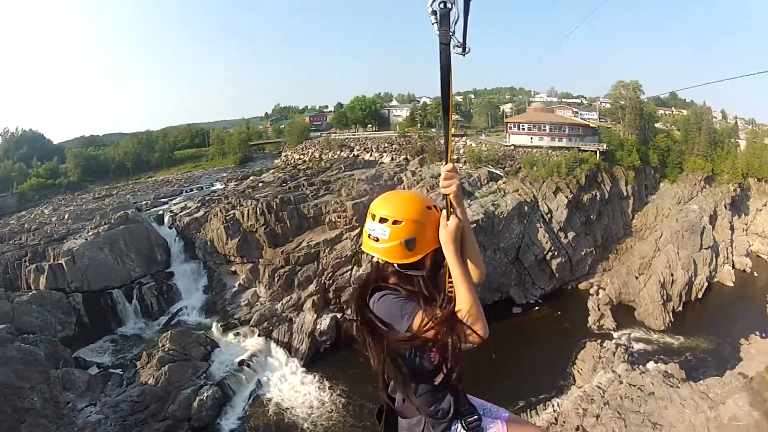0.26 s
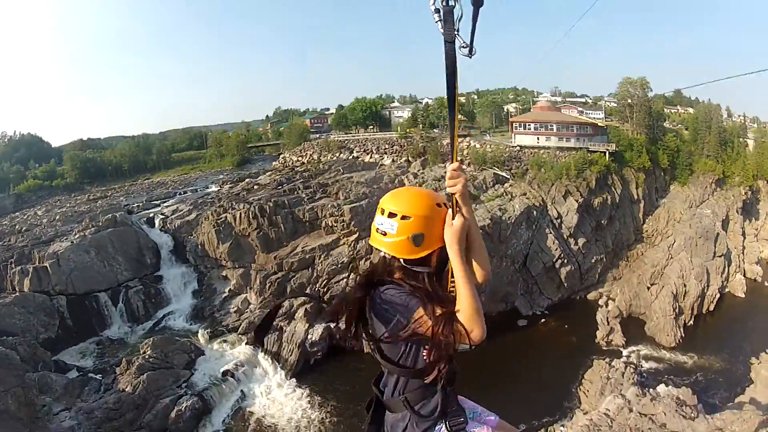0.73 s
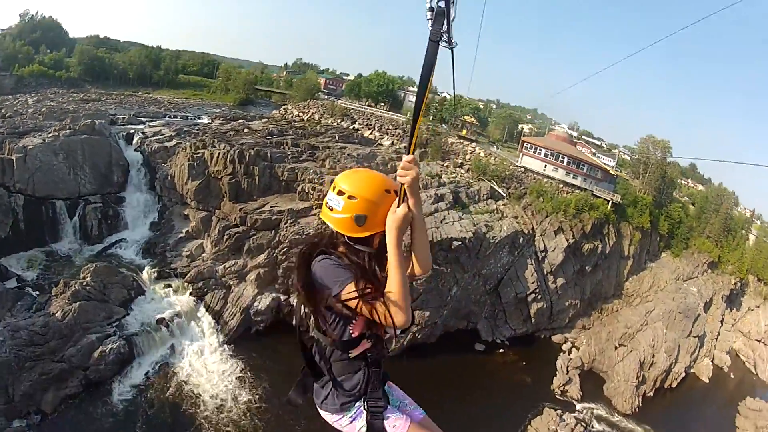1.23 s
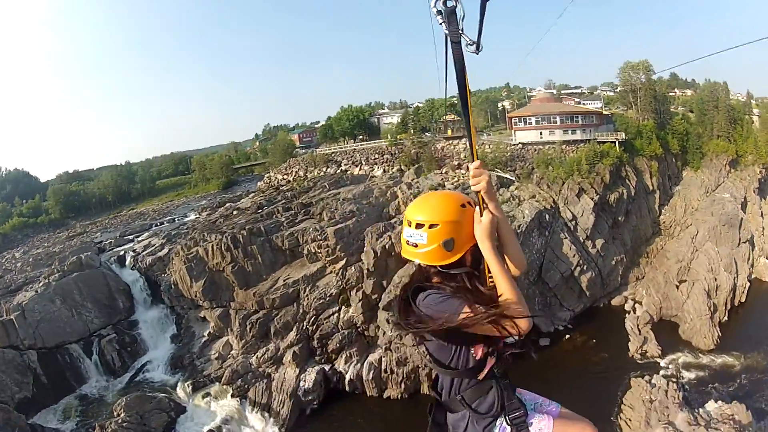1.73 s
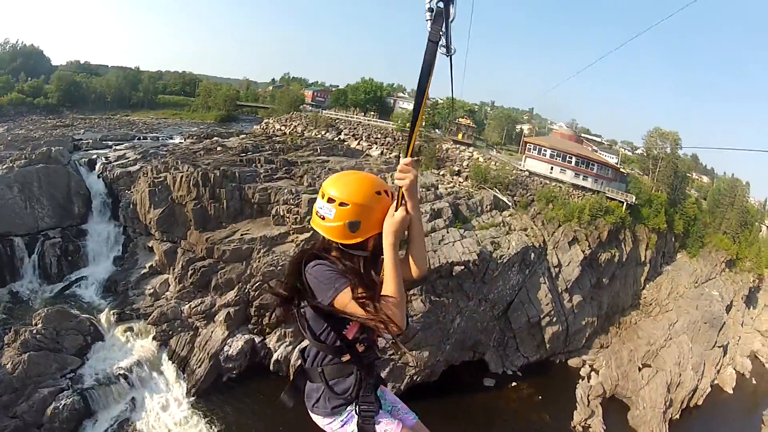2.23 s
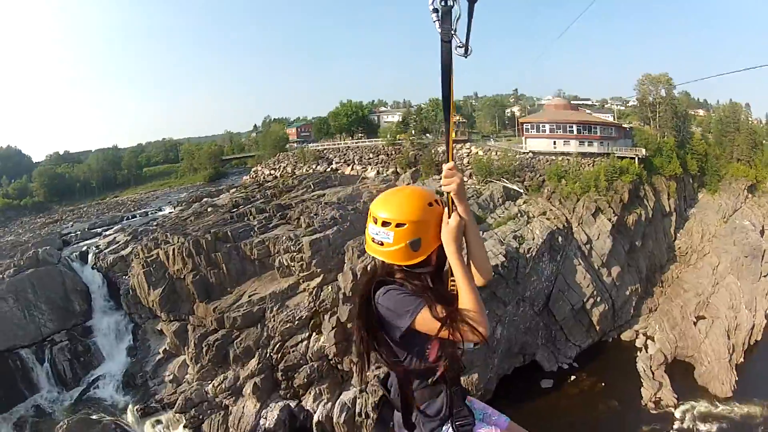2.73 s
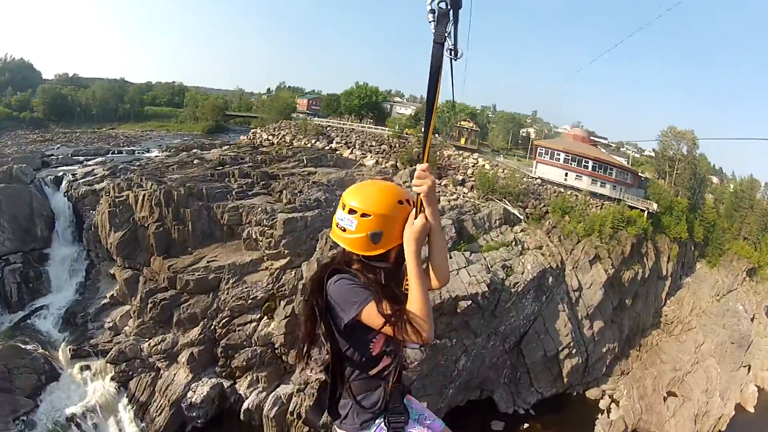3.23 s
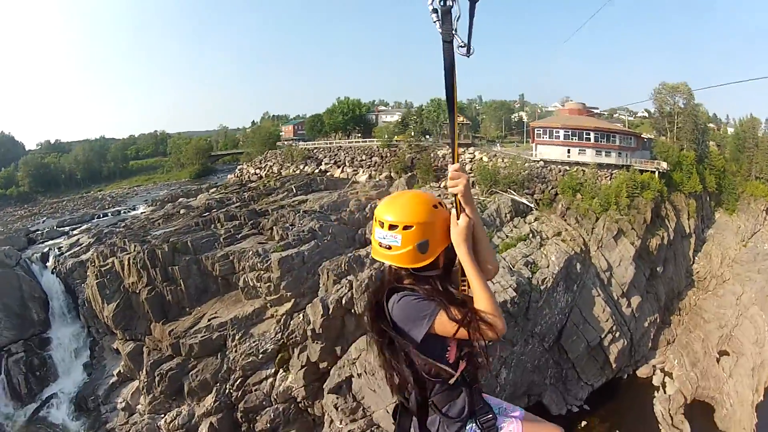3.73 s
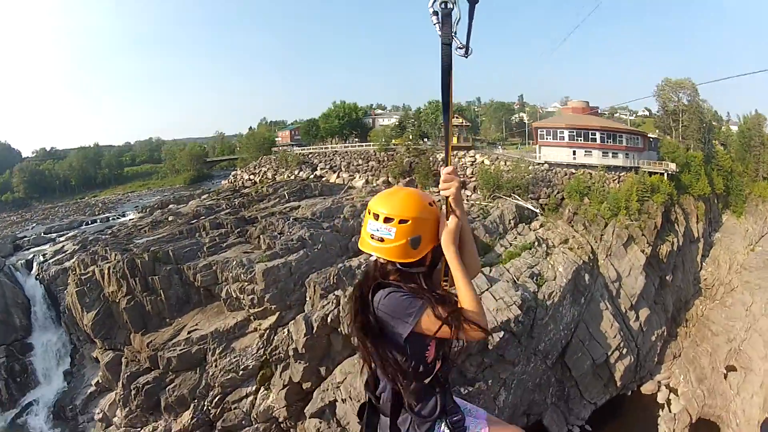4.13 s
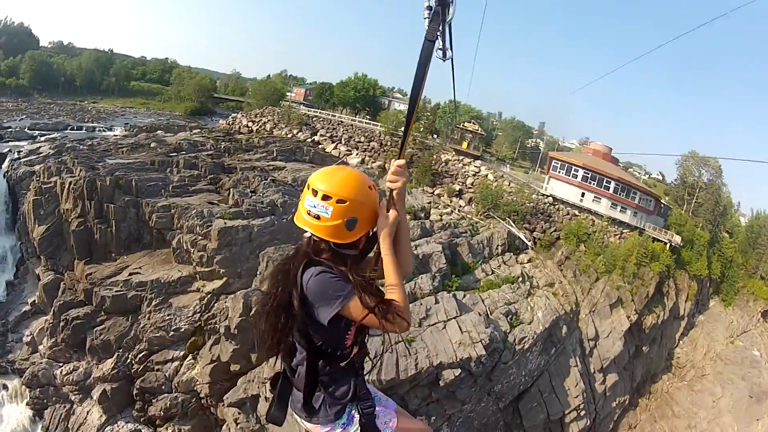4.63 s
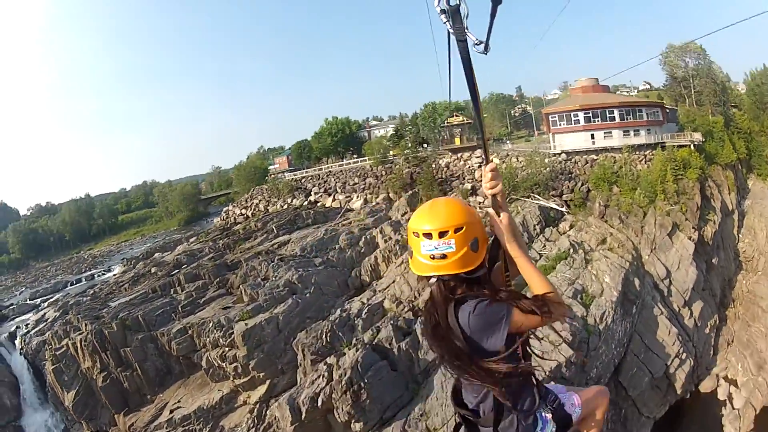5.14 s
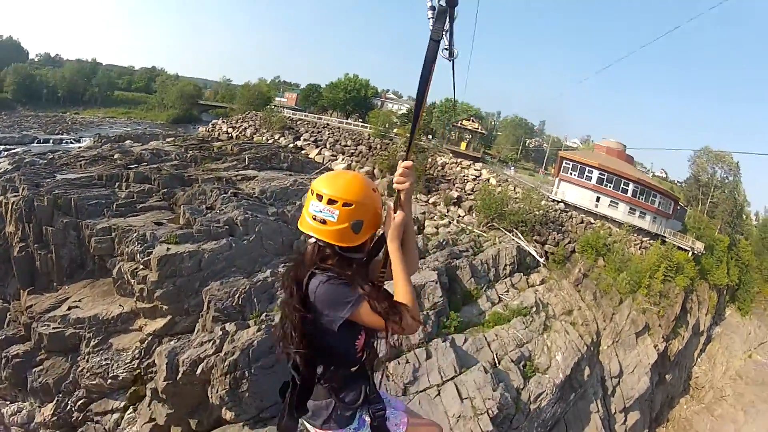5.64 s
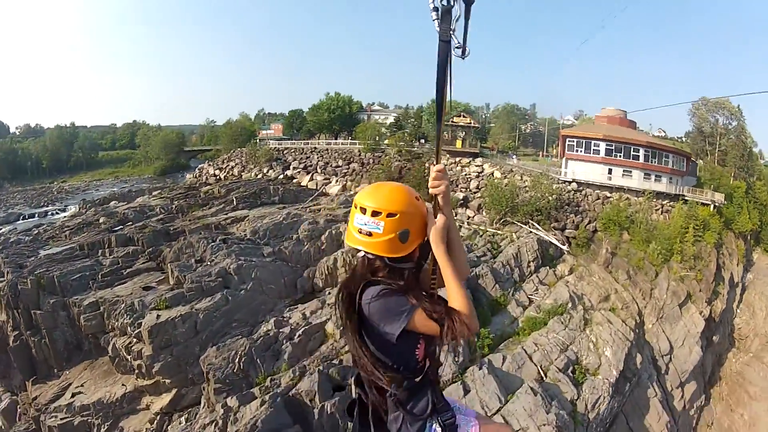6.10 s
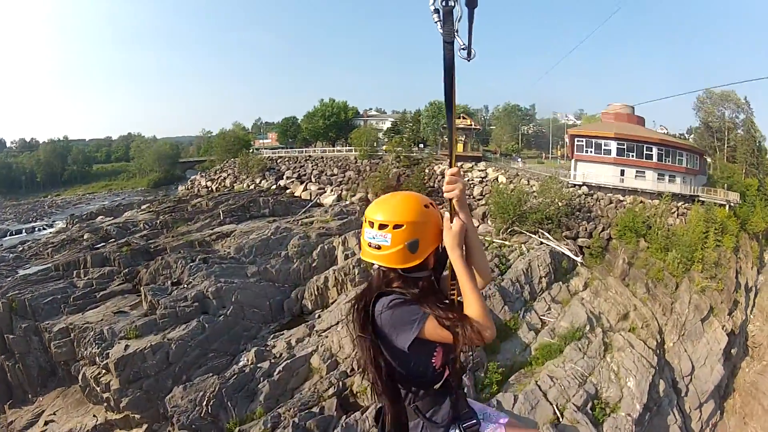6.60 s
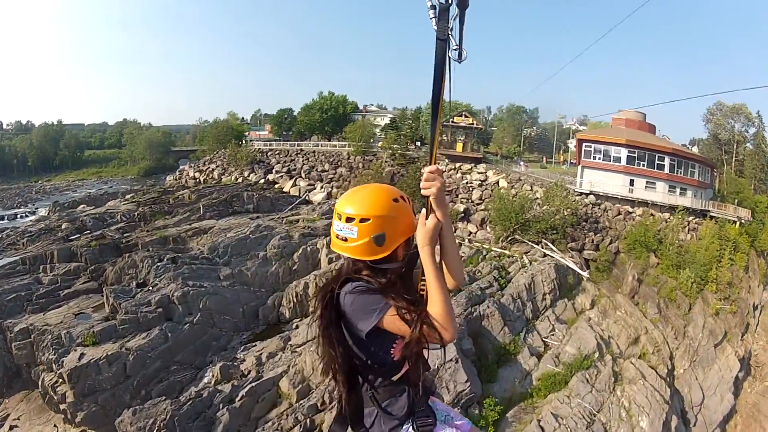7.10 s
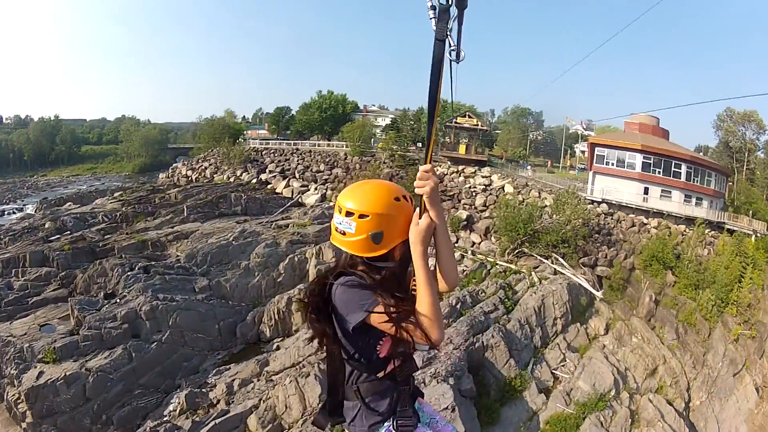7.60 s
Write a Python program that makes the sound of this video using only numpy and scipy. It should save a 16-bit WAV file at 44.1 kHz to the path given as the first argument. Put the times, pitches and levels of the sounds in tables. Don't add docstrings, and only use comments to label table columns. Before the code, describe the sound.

A trolley's wheels roll along a steel cable with a harsh rattling whir, irregular dull knocks and a wavering hum that slowly falls in pitch.

```python
import sys
import numpy as np
from scipy import signal
from scipy.fft import rfft, irfft, next_fast_len
from scipy.io import wavfile
from scipy.ndimage import uniform_filter1d

SR = 44100
rng = np.random.default_rng(int(sys.argv[2]) if len(sys.argv) > 2 else 0)


def linear_from_db(decibels):
    return 10 ** (np.asarray(decibels, float) / 20)


def store_pcm(level_fs):
    pcm = np.round(np.clip(level_fs, -1, 1) * 32767).astype(np.int16)
    wavfile.write(sys.argv[1], SR, np.atleast_2d(pcm).T)


N = 346626
T = np.arange(N) / SR
F = np.fft.rfftfreq(next_fast_len(N), 1 / SR)


def curves(table):
    seconds, *columns = np.transpose(table)
    return [np.interp(T, seconds, column) for column in columns]


def unit(x):
    return x / np.sqrt(np.mean(x ** 2))


def noise():
    return rng.standard_normal(N)


def walk(rate_hz):
    hold = int(SR / rate_hz)
    held = np.repeat(rng.standard_normal(N // hold + 1), hold)
    smooth = uniform_filter1d(uniform_filter1d(held, hold), hold)
    return unit(smooth[:N])


def bump(s, length_s):
    return np.exp(-(2 * (T - s) / length_s) ** 2)


def ring(x, power):
    cepstrum = irfft(np.log(power + 1e-12) / 2)
    half = len(cepstrum) // 2
    cepstrum[1:half] *= 2
    cepstrum[half + 1:] = 0
    response = np.exp(rfft(cepstrum))
    return irfft(rfft(x, len(cepstrum)) * response)[:N]


def body(modes, steep=1.28):
    return sum(linear_from_db(2 * db) / (1 + (2 * (F - hz) / width) ** 2) ** steep for hz, width, db in modes)


def case(cutoff_hz=548, leak_db=-11.5, order=12):
    return linear_from_db(2 * leak_db) + 1 / (1 + (cutoff_hz / (F + 1)) ** (2 * order))


# time in seconds, level in dB.
WIND_LEVEL = [
    (0, -43),
    (1.1, -39.5),
    (1.6, -43),
    (2.4, -41),
    (3.3, -49),
    (4.3, -44.5),
    (5.6, -41),
    (6.9, -46.5),
    (7.4, -50.5),
    (7.86, -45),
]
# peak time in seconds, level in dB, length in seconds,
# level of the upper rumble relative to the thump in dB.
GUSTS = [(.08, -31, 0.22, -4), (0.317, -40, 0.072, -14), (0.622, -36, 0.18, -6), (.81, -31, .07, -18),
         (1.047, -35, 0.087, -11), (1.3, -41, .07, 6), (1.493, -41, .06, 3), (1.97, -38, .07, -4),
         (2.118, -38, 0.036, 0), (2.19, -37, .06, -6), (2.3, -39, .05, 2), (2.6, -42, .08, -1),
         (2.883, -40, .04, 4), (3.06, -41, .06, -4), (3.533, -38, .04, -8), (4.08, -42, .1, -4),
         (4.53, -35, .1, -13), (4.746, -34, .05, -10), (5.115, -39, 0.092, -7), (5.41, -42, .06, -3),
         (5.7, -43, 0.12, 2), (5.912, -31, 0.067, -3), (6.14, -25, .055, -1), (6.39, -44, 0.061, 0),
         (7.0, -41, 0.18, -4), (7.2, -36.5, .06, -5)]


def wind():
    steady = linear_from_db(curves(WIND_LEVEL)[0])
    thump = steady.copy()
    rumble = steady * linear_from_db(5.5)
    for s, db, length_s, upper_db in GUSTS:
        swell = bump(s, length_s)
        thump += linear_from_db(db) * swell
        rumble += linear_from_db(db + upper_db) * swell
    deep = unit(ring(noise(), body([(67, 140, 0)], steep=2.2)))
    upper = unit(ring(noise(), body([(156.4, 200, 0)], steep=1.7)))
    stream = unit(ring(noise(), body([(150, 240, -2), (418, 120, 1)], steep=1.69)))
    gusting = linear_from_db(-4.5) * thump * deep + linear_from_db(-6.0) * rumble * upper
    return linear_from_db(1.2 * walk(14)) * gusting + linear_from_db(-43.5) * stream


# time in seconds, hum level in dB.
HUM_LEVEL = [(0, -39), (.45, -31.5), (.95, -33), (1.4, -42), (2.2, -35), (3.1, -31.5), (4.0, -30),
             (4.4, -31.5), (5.35, -26.5), (5.75, -29), (6.1, -34), (6.7, -35), (7.05, -41), (7.42, -39),
             (7.58, -29), (7.86, -28.5)]


def hum(turn):
    phase = 2 * np.pi * turn + 0.4 * walk(6)
    tone = np.sin(phase) + linear_from_db(-12.5) * np.sin(2 * phase)
    level_db = curves(HUM_LEVEL)[0] + 1.7 * walk(9)
    return np.sqrt(2) * tone * linear_from_db(level_db)


# time in seconds, peak level in dB, pitch in Hz,
# depth of the gain duck that follows in dB.
KNOCKS = [(0.225, -6, 910, 7.5), (0.376, -14, 704, 3.5), (0.767, -10, 700, 0), (1.82, -5, 700, 7),
          (2.034, -6, 875, 11.5), (2.41, -7, 880, 2), (3.359, -4.5, 880, 8), (3.511, -21, 592, 4),
          (3.849, -13, 883, 2.5), (4.055, -17, 630, 1.5), (4.387, -11, 735, 2), (4.998, -11, 600, -0.5),
          (5.222, -8, 1010, 3), (5.391, -6, 593, 4), (5.693, -5.5, 746, 5.5), (6.32, -6, 560, 3),
          (6.673, -6, 1410, 8), (6.939, -13, 641, 4), (7.016, -7, 700, 1), (7.332, -17, 982, 3.5)]


def knocks():
    out = np.zeros(N + SR)
    t = np.arange(SR // 40) / SR
    envelope = (t / 0.0013) * np.exp(1 - t / 0.0012)
    for s, db, hz, _ in KNOCKS:
        start = int((s - 0.0015) * SR)
        out[start:start + len(t)] += linear_from_db(db - 4.0) * np.sin(2 * np.pi * hz * t) * envelope
    return out[:N]


def taps(per_s, scatter_db):
    hit = rng.random(N) < per_s / SR
    sign = rng.choice([-1., 1.], N)
    return unit(hit * sign * linear_from_db(scatter_db * rng.exponential(size=N)))


# frequency in Hz, width in Hz, level in dB.
LOW_MODES = [(580, 69, 2.5), (689, 103, 0.5), (753, 52, -0.5), (866, 73, 0.5), (1026, 87, -2.5),
             (1134, 105, -8.5), (1330, 180, -5), (1446, 204, -3.5), (1584, 89, -3.5), (1880, 109, -6),
             (1960, 210, -10)]
# frequency in Hz, width in Hz, level in dB.
HIGH_MODES = [(2090, 190, -13), (2513, 245, -9.5), (2946, 194, -1.5), (3160, 108, -1), (3264, 115, -3.5),
              (3490, 60, -9.5), (3770, 170, -2), (3910, 150, -5.5), (4196, 450, -10.5), (4910, 530, -17.5),
              (5305, 130, -21), (5696, 100, -19)]
# time in seconds, change of rumble level in dB.
JOLTS = [(0.0, 3.5), (.24, -2), (.33, -3.5), (.355, 3.5), (1.07, 1.5), (1.86, -0.5), (1.88, 0), (1.95, 1),
         (2.03, 0.5), (2.07, -1), (4.23, 0.5), (4.38, 3.5), (4.46, -0.5), (5.21, 1.5), (6.67, 1),
         (6.71, -1.5), (7.24, -2), (7.27, 2)]


def rolling(turn):
    jolt_db = sum(db * bump(s, 2 * 0.013) for s, db in JOLTS)
    flutter_db = 0.67 * walk(25) + 0.86 * walk(90)
    strands = 6
    lay = 1 + 0.087 * np.cos(2 * np.pi * turn / strands)
    shared = taps(per_s=1800, scatter_db=2.1)
    grind = unit(noise() + 0.74 * shared) * linear_from_db(0.65 * flutter_db)
    rattle = unit(noise() + 0.85 * shared) * linear_from_db(0.77 * flutter_db) * lay
    low = unit(ring(grind, body(LOW_MODES) * case()))
    high = unit(ring(rattle, body(HIGH_MODES) * case()))
    low_gain = linear_from_db(jolt_db - 0.1)
    high_gain = linear_from_db(-7.5 + 0.16 * jolt_db + 1.53)
    return linear_from_db(-19.5) * (low_gain * low + high_gain * high)


# time in seconds, strand passing rate in Hz.
SPEED = [
    (0, 706),
    (.8, 700),
    (2.2, 672),
    (3.3, 652),
    (4, 631),
    (5, 592),
    (5.8, 553),
    (7, 509),
    (7.86, 472),
]


def scene():
    turn = np.cumsum(curves(SPEED)[0]) / SR
    through_case = ring(hum(turn) + knocks(), case())
    return (rolling(turn) + through_case + wind())[None]


def ducking(attack_s=0.021, release_s=0.033):
    gain_db = np.zeros(N)
    for s, _, _, duck_db in KNOCKS:
        since = np.maximum(T - s - 0.002, 0)
        gain_db -= duck_db * (1 - np.exp(-since / attack_s)) * np.exp(-since / release_s)
    return gain_db


def top_cut(x):
    return signal.sosfilt(signal.butter(12, 15770, fs=SR, output="sos"), x)


def record(dry):
    x = dry[0] * linear_from_db(ducking() + 0.9)
    x = x / (1 + (x / 0.55) ** 4) ** (1 / 4)
    x = ring(x, 1 / (1 + (F / 5900) ** 30))
    held = np.repeat(signal.resample_poly(x, 40, 147), 4)
    mix = signal.resample_poly(held, 147, 160)[:N]
    return top_cut(mix)


dry = scene()
out = record(dry)
store_pcm(out)
```